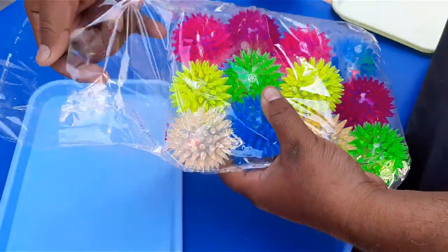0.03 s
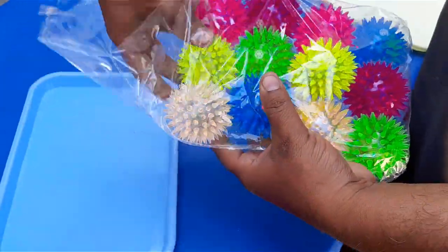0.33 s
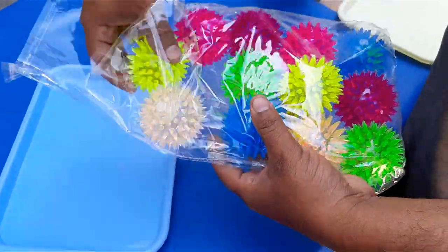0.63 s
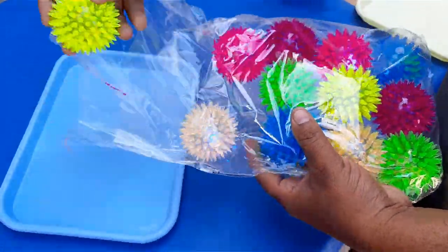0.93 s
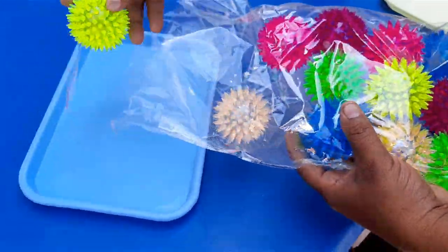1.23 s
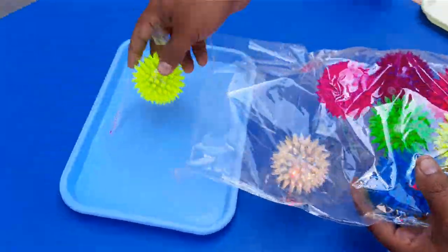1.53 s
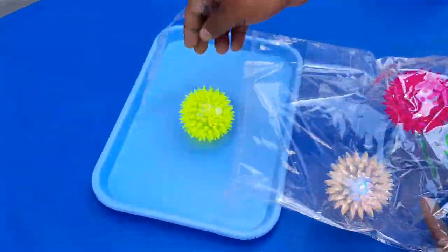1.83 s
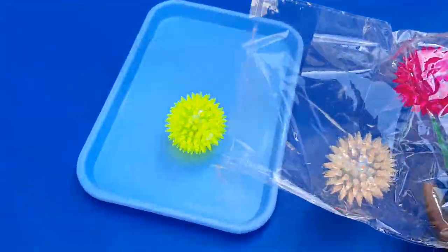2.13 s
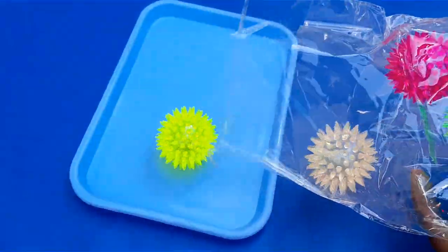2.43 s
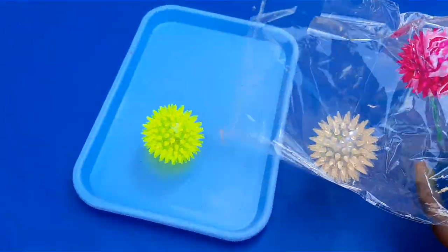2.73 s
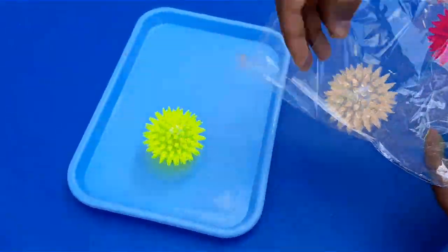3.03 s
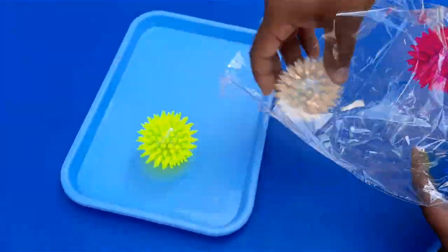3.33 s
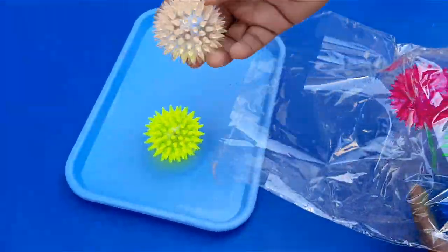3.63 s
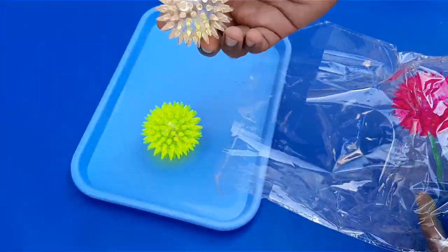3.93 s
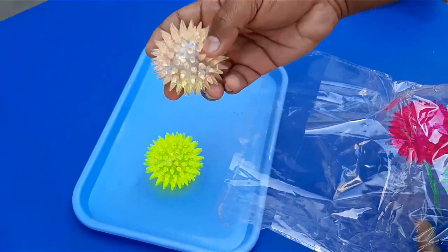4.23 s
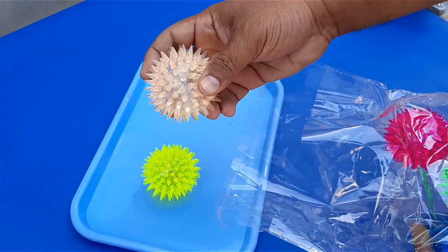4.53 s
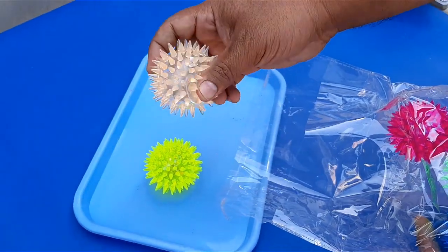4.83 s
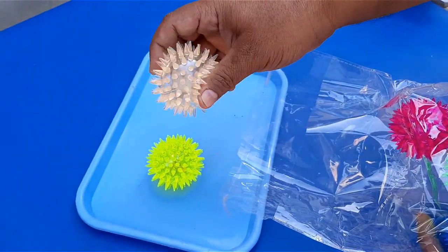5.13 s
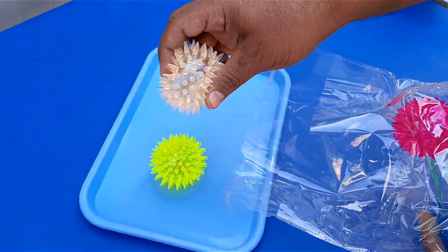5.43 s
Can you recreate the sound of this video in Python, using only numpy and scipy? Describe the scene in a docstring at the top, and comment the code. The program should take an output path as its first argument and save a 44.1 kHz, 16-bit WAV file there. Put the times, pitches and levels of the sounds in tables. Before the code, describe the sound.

Crisp, close rustling of a plastic bag comes in two bursts, followed by short, high squeaks from a squeezed rubber toy ball.

```python
"""A thin, crisp plastic bag crackles close by in a small room as hands pull out two spiky rubber balls.
The film buckles in countless tiny snaps and a few loud ones, over a soft handling rumble.
The second ball is then squeezed four times: its reed squeaks through a short pipe as the air
goes out, and again as the rubber springs back and draws it in."""
import sys
import numpy as np
from scipy import signal
from scipy.fft import rfft, irfft, next_fast_len
from scipy.io import wavfile
from scipy.ndimage import uniform_filter1d, minimum_filter1d, map_coordinates

SR = 44100
rng = np.random.default_rng(int(sys.argv[2]) if len(sys.argv) > 2 else 0)


def bounce(signal):
    """Save signal as a 16-bit WAV file at the path given by the first command-line argument."""
    frames = np.transpose(np.atleast_2d(signal))
    limited = np.clip(frames, -1, 1)
    pcm = np.round(limited * 32767).astype(np.int16)
    wavfile.write(sys.argv[1], SR, pcm)


N = 250488

# loud buckles of the film: t/s, level/dB, sheet body/dB, panel ring/Hz
LOUD_BUCKLES = [(0.0096, -4, -12, 2990), (0.0547, -1, -19, 1460), (0.0814, -6, -9, 2750),
                (0.1145, -6, -10, 1710), (0.2327, -8, -16, 1450), (0.5611, -7, -17, 1520),
                (0.6729, -1, -11, 1830), (0.755, -2, -9, 1590), (0.7775, -6, -8, 1700),
                (0.8424, -13, -6, 1500), (0.8808, -14, 3, 1740), (0.9065, -16, -5, 1790),
                (1.0927, -14, -8, 1770), (1.0985, -14, -11, 1770), (1.1272, -14, -7, 1600),
                (1.1977, -18, -13, 2540), (1.2291, -22, -18, 2960), (1.2728, -17, 3, 1750),
                (1.2894, -17, -3, 1540), (1.3096, -15, -3, 1430), (1.4037, -17, -14, 1290),
                (1.4329, -18, -16, 1500), (1.453, -25, -10, 2900), (1.5719, -20, -14, 2200),
                (1.6942, -36, 12, 1360), (1.7266, -17, -10, 1870), (1.7417, -23, 1, 1440),
                (1.8993, -15, -13, 1830), (1.9223, -19, -13, 2560), (1.9812, -12, -13, 2010),
                (2.0108, -23, -20, 1590), (2.0947, -13, -17, 1580), (2.2716, -10, -9, 1600),
                (2.2808, -17, -10, 1610), (2.3659, -24, 3, 1570), (2.4235, -22, -4, 2600),
                (2.4619, -21, -5, 1730), (2.4806, -16, -3, 1930), (2.5048, -19, -9, 1560),
                (2.5424, -19, -12, 2550), (2.6226, -21, -15, 2900), (2.7268, -20, -3, 2580),
                (2.7763, -21, -10, 1810), (3.0123, -25, -20, 1420), (3.0478, -21, -1, 1990),
                (3.143, -7, -9, 1600), (3.2636, -4, -15, 1730), (3.4276, -13, -7, 1710),
                (3.5584, -25, -19, 1350), (3.6808, -27, -8, 1750)]
# tone colour of the film: f/Hz, level/dB
FILM_SPECTRUM = [(25, -44), (100, -17), (360, -14), (680, -16), (1000, 0), (1600, 1.5), (2600, -0.5),
                 (4200, -6.5), (6500, -2.5), (8500, -1), (10300, -2.5), (12000, -15.5), (15500, -16.5)]
BAG_STILL_S, TOP_HZ = 3.74, 15900  # the crinkling ends; band limit
STALL_HZ, LEAK_S = 1198.3, 0.019  # as the pressure leaks away the pitch sinks to where the reed stalls


def buckles(times, body_db, panel_hz, crack_t60, ring_t60, facet_db, facet_octaves, panel_db, size=1536):
    """One row of peak 1 per buckle: a crack and a short ring, coloured by the facet that flips."""
    # taut film snaps at a higher pitch: t/s, f/Hz
    tautness = [(0, 8000), (.8, 7500), (1.5, 8600), (2.1, 9800), (2.7, 8400), (3.3, 9000), (3.7, 6800)]
    chance = rng.standard_normal((len(times), 2))
    facet_hz = curves(tautness, times)[0][:, None] * np.exp(.18 * chance[:, :1])
    t = np.arange(size) / SR - .0005
    age = np.abs(t) * np.exp(.3 * chance[:, 1:])  # some folds flip at once, others run along the crease
    envelope = (t > 0) * (amp(-60 * age / crack_t60) + amp(-10 - 60 * t / ring_t60))
    hz = np.fft.rfftfreq(size, 1 / SR) + 1
    facet = facet_db * np.exp(-.5 * (np.log2(hz / facet_hz) / facet_octaves) ** 2)
    sheet = body_db[:, None] / (1 + (hz / 3500) ** 4)
    # the flat stretch next to the fold rings, with a half-width of 70 Hz
    panel = 1 + amp(panel_db) / (1 + 1j * (hz - panel_hz[:, None]) / 70)
    bursts = rng.standard_normal(envelope.shape) * envelope
    clicks = irfft(rfft(bursts) * amp(along(FILM_SPECTRUM, hz) + facet + sheet) * panel)
    return clicks / np.abs(clicks).max(axis=1, keepdims=True)


def snaps(events, level_db, body_db):
    """Single sharp clicks; the bigger the fold, the longer its crack."""
    start, db, body, panel_hz = np.transpose(events)
    crack_t60 = .0036 * (1 + 1.5 * amp(db + 7))[:, None]
    clicks = buckles(start, body + body_db, panel_hz, crack_t60,
                     ring_t60=.021, facet_db=7, facet_octaves=.23, panel_db=12)
    out = np.zeros(N)
    add(out, start - .0005, clicks * amp(db + level_db)[:, None])
    return out


def bag_motion():
    """Envelopes of the crackle and of the sheet's body: two digs, short rustles and a faint creep."""
    # a hand digs for a ball, one curve per dig: t/s, crackle/dB, sheet body/dB
    digs = [
        [(0.0, -26, -45), (0.118, -23, -37), (0.128, -29.5, -38.5), (0.202, -23.5, -31), (0.252, -30, -38),
         (0.404, -21, -29.5), (0.55, -33.5, -38.5), (0.566, -25, -30.5), (0.798, -22, -34), (0.87, -41, -39.5)],
        [(2.98, -60, -68.5), (3.052, -38, -43), (3.058, -41.5, -54), (3.156, -24, -30.5), (3.178, -29, -28.5),
         (3.268, -20, -35), (3.296, -32, -39.5), (3.388, -24, -30), (3.534, -52, -53.5), (3.54, -62, -64)],
    ]
    # the bag is let go and sags: t/s, length/s, crackle/dB, sheet body/dB
    rustles = [(.88, .1, -35.5, -38), (1.01, .04, -29, -37.5), (1.11, .04, -33, -42), (1.17, .09, -43, -64),
               (1.285, .035, -41, -44), (1.33, .11, -46.5, -55.5), (1.56, .06, -41.5, -48.5),
               (1.72, .025, -44.5, -39.5), (1.81, .02, -46, -49), (1.96, .04, -45, -45.5),
               (2.03, .08, -57.5, -65), (2.27, .11, -52, -53), (2.395, .03, -43, -51),
               (2.47, .03, -39, -41), (2.53, .08, -56.5, -63.5), (2.76, .03, -48.5, -51.5),
               (2.83, .035, -48.5, -57.5), (3.55, .12, -61, -61)]
    t = np.arange(N) / SR
    # every loud buckle stirs the film around it
    stirred = swells([(s, 0, db - 32) for s, db, *_ in LOUD_BUCKLES], rise_s=.01, fall_s=.022)
    creep = amp(-65)  # held film never quite rests
    envelopes = []
    for layer in range(2):
        gain = swells([(s, length, db[layer]) for s, length, *db in rustles], rise_s=.018, fall_s=.015)
        for dig in digs:
            digging = (t >= dig[0][0]) * (t <= dig[-1][0])
            gain = np.hypot(gain, amp(curves(dig, t)[layer]) * digging)
        envelopes.append(np.sqrt(gain ** 2 + stirred ** 2 + creep ** 2))
    return envelopes


def crinkle(crackle, body, count=1600):
    """Swarms of tiny buckles, denser the harder the bag is worked, over the hiss of film on film."""
    t = np.arange(N) / SR
    stir = crackle * np.clip((BAG_STILL_S - t) / .034, 0, 1)
    rate = stir ** .36
    rate *= count / rate.sum()  # buckles per sample
    slots = np.arange(count) + rng.uniform(-1, 1, count)
    times = np.interp(slots, np.cumsum(rate), t).clip(0, BAG_STILL_S)
    body_spread, level_spread, pitch_spread = rng.standard_normal((count, 3)).T
    body_db = np.interp(times, t, 20 * np.log10(body / crackle)) + 1.5 + 3 * body_spread
    clicks = buckles(times, body_db, panel_hz=1650 * np.exp(.27 * pitch_spread),
                     crack_t60=.007, ring_t60=.03, facet_db=5, facet_octaves=.35, panel_db=5)
    gains = unit(amp(10.8 * np.clip(level_spread, -2, np.sqrt(2)))) / np.linalg.norm(clicks, axis=1)
    swarm = np.zeros(N)
    add(swarm, times, clicks * gains[:, None])
    # balls bump inside the bag: f/Hz, level/dB
    jostle_spectrum = [(25, -27), (350, 1), (520, -3.5), (850, -14.5), (2000, -56.5)]
    lumps = amp(6 * np.tanh(wobble(40, N)))
    jostle = amp(-24.5) * lumps * noise(jostle_spectrum)
    slide = amp(-15.5) * noise(FILM_SPECTRUM)
    return stir * (amp(.5) * swarm / np.sqrt(rate + 1e-4) + slide + jostle)


def reed(hz, db, rough, pipe, jitter, flutter_db, rasp, low_hz):
    """A beating reed: harmonics glide through the pipe's resonances and rattle as roughness rises."""
    t = np.arange(len(hz)) / SR
    hz = hz * (1 + jitter * rough * wobble(700, len(t)))
    phase = 2 * np.pi * np.cumsum(hz) / SR
    orders = np.arange(1, 14)[:, None]
    gains = amp(along(pipe, orders * hz)) * (orders * hz < TOP_HZ)
    # the harmonic nearest the pipe's resonance locks on; the others flutter
    loose = (1 - gains / gains.max(axis=0)) * np.sqrt(np.abs(rough))
    flutter, slip = np.array([[wobble(260, len(t)) for _ in orders] for _ in range(2)])
    gains *= amp(flutter_db * loose * flutter)
    gains /= np.sqrt(np.sum(gains ** 2, axis=0) / 2)
    offsets = 2 * loose ** 2 * slip + rng.uniform(0, 2 * np.pi, orders.shape)
    tone = np.sum(gains * np.sin(orders * phase + offsets), axis=0)
    # turbulence leaves the slit in one puff per cycle
    puffs = rng.standard_normal(len(t)) * (1 + np.cos(phase))
    bins_hz = np.fft.rfftfreq(len(t), 1 / SR)
    low_cut = (bins_hz ** 2 / (bins_hz ** 2 + low_hz ** 2)) ** 2
    jet = unit(irfft(rfft(puffs) * amp(.65 * along(pipe, bins_hz)) * low_cut, len(t)))
    fades = ramp(t, 0, .002) * ramp(t[-1] - t, 0, .002)
    return amp(db) * fades * (tone + rasp * rough * jet)


def squeeze(push_s, length_s, first_hz, pushed_hz, rise_s, db, sag_db, rough, stretch, stall_s=.0098):
    """The outward squeak glides while the fingers push, then sinks as the pressure leaks away."""
    # the pipe's resonances, blowing out: f/Hz, level/dB
    pipe_out = [(250, -26), (700, -31), (1200, -16), (1700, -11), (2200, -18), (2800, -11), (3700, -18.5),
                (4500, -14), (5400, -3.5), (6200, 4), (7100, 4.5), (8200, -5.5), (10000, -9), (11000, -15),
                (12800, -29), (15500, -33)]
    t = np.arange(int(length_s * SR)) / SR
    pressure = np.exp(-np.maximum(t - push_s, 0) / LEAK_S)
    glide = np.exp(-np.minimum(t, push_s) / rise_s)
    driven_hz = pushed_hz + (first_hz - pushed_hz) * glide
    hz = STALL_HZ + (driven_hz - STALL_HZ) * pressure
    level = db - sag_db * (1 - pressure) - 19.5 * ramp(t, length_s - stall_s, stall_s)
    rattle = rough * (2 - pressure * (1 - glide))  # twice as rough at slack pressure
    pipe = [(f * stretch, gain_db) for f, gain_db in pipe_out]
    return reed(hz, level, rattle, pipe, jitter=.022, flutter_db=7, rasp=.26, low_hz=150)


def release(draw_s, pop_s, first_hz, drawn_hz, pop_hz, db, swell_db, rough, stall_s=.02247):
    """The wall springs back: the pitch creeps up, jumps as the dent pops out and sinks into a rattle."""
    # the pipe's resonances, drawing in: f/Hz, level/dB
    pipe_in = [(700, -38), (1200, -16.5), (1700, -10), (2200, -23), (2800, -12.5), (3700, -24), (4500, -19),
               (5700, -19.5), (7100, 1.5), (8300, 1), (9200, -4), (10000, -13.5), (11500, -20.5),
               (12800, -26.5), (15500, -43)]
    length_s = draw_s + pop_s + .0314  # the reed sounds on after the pop
    t = np.arange(int(length_s * SR)) / SR
    pop = ramp(t, draw_s, .007)
    suction = np.exp(-np.maximum(t - draw_s - pop_s, 0) / LEAK_S)
    driven_hz = first_hz + (drawn_hz - first_hz) * ramp(t, 0, draw_s) + (pop_hz - drawn_hz) * pop
    hz = STALL_HZ + (driven_hz - STALL_HZ) * suction
    level = db - swell_db * np.exp(-t / .01) - 19.5 * ramp(t, length_s - stall_s, stall_s)
    rattle = rough + .1 * pop + .4 * (1 - suction)
    return reed(hz, level, rattle, pipe_in, jitter=.036, flutter_db=7.5, rasp=.39, low_hz=800)


def squeaky_ball():
    """Air squeaks and hisses through the reed on the way out and on the way back."""
    # air out: t/s, push/s, length/s, first/Hz, pushed/Hz, rise/s, level/dB, sag/dB, roughness,
    # stretch of the pipe's resonances
    squeezes = [(4.472, .014, 0.03765, 1351, 1332, .003, -8, 2.5, 0.16, 1.046),
                (4.883, .024, 0.08875, 1376, 1457, .007, -8.5, 13, 0.06, 1.071),
                (5.193, .036, 0.0758, 1442, 2202, .007, -3.5, 8.5, 0.32, 0.973),
                (5.478, .042, 0.0791, 1437, 2198, .024, -5, 8, 0.25, 0.993)]
    # air in: t/s, draw/s, pop/s, first/Hz, drawn/Hz, pop/Hz, level/dB, swell/dB, roughness
    releases = [(4.554, 0.04765, 0.019, 1412, 1430, 1488, -9.5, -7.5, 0.01),
                (5.004, 0.0397, .013, 1372, 1443, 1499, -8.5, 4, 0.01),
                (5.292, 0.05403, .011, 1352, 1531, 1702, -10, 12, 0.2),
                (5.573, 0.0454, 0.015, 1277, 1649, 1803, -9.5, 14, .14)]
    # breath of each squeeze and refill: t/s, length/s, level/dB
    airflow = [(4.377, .28, -43), (4.878, 0.25, -48), (5.2, 0.17, -40), (5.49, 0.12, -44.5)]
    # colour of that breath: f/Hz, level/dB
    hiss_spectrum = [(1000, -38.5), (2000, -26.5), (4200, -42), (5600, -24), (7000, 3), (8300, -3),
                     (10300, -5.5), (12900, -17), (15500, -41.5)]
    out = swells(airflow, rise_s=.008, fall_s=.022) * noise(hiss_spectrum)
    for stroke, events, trim_db in (squeeze, squeezes, 2.5), (release, releases, -.5):
        add(out, [row[0] for row in events], [amp(trim_db) * stroke(*row[1:]) for row in events])
    return out


def spike_flicks():
    """Fingers flick the ball's spikes: two faint clicks."""
    # flicks: t/s, level/dB, body/dB, ring/Hz
    flicks = [(3.892, -40.5, -26, 1367), (4.778, -35.5, -46.5, 1345)]
    return snaps(flicks, level_db=2.5, body_db=1)


def handling_rumble(crackle):
    """Dull rumble of gripping hands, bumps and the dragged bag, which follows the crackle."""
    # hands and balls bump the table: t/s, length/s, level/dB
    bumps = [(1.66, 0.053, -52.5), (2.58, 0.0247, -49.5), (3.88, .07, -51.5)]
    # colour of the rumble: f/Hz, level/dB
    rumble_spectrum = [(20, -30), (45, -10), (75, 1), (140, -4), (260, -3.5), (450, -24), (800, -32),
                       (1500, -54.5)]
    hold, shift_grip = (0, 1.6, -67.5), (1.6, 2.77, -57.5)  # same columns as the bumps
    contact = swells(bumps + [hold, shift_grip], rise_s=.022, fall_s=.07)
    drag = amp(-26) * crackle
    return np.hypot(contact, drag) * amp(.69 * wobble(37, N)) * noise(rumble_spectrum)


def rubber_friction():
    """Skin rubs on rubber; a spike chirps as it slips under a finger."""
    # finger strokes: t/s, length/s, level/dB
    rubs = [(3.62, .05, -53), (4.01, 0.042, -63.5), (4.12, 0.031, -61), (4.425, 0.03, -56.5)]
    # colour of rubbed rubber: f/Hz, level/dB
    rubber_spectrum = [(400, -17), (900, -10), (1350, 7), (2000, -21.5), (3300, -17.5), (5400, -20),
                       (13000, -25)]
    # slipping spikes: t/s, f/Hz, level/dB
    slips = [(3.834, 5780, -58), (4.038, 5403, -53)]
    t = np.arange(N) / SR
    out = swells(rubs, rise_s=.02, fall_s=.025) * amp(3.7 * wobble(73, N)) * noise(rubber_spectrum)
    for s, hz, db in slips:
        out += swells([(s, .00412, db)], rise_s=.00092, fall_s=.00403) * np.sin(2 * np.pi * hz * t)
    return out


def landing():
    """The first soft ball meets a tray with one low thud."""
    # the thud: t/s, f/Hz, level/dB, t60/s
    thud = (2.03, 107, -39, 0.01)
    start, hz, db, t60 = thud
    t = np.maximum(np.arange(N) / SR - start, 0)
    return amp(db - 60 * t / t60) * np.sin(2 * np.pi * hz * t)


def room(x, early_db, early_t60, tail_db):
    """Quick echoes from the table and tray, then a faint tail from the walls."""
    # decay of the walls' tail: f/Hz, t60/s
    decay_times = [(1500, 0.23), (4000, 0.37), (7000, 0.083), (8400, 0.26), (10000, 0.14), (13000, 0.04)]
    hz, t, bands = signal.stft(rng.standard_normal(SR // 2), SR, nperseg=256)
    tail = signal.istft(bands * amp(-60 * t / along(decay_times, hz)[:, None]), SR, nperseg=256)[1]
    t = np.arange(len(tail)) / SR
    tail *= ramp(t, 0, .015)
    early = rng.standard_normal(len(t)) * (t > .001) * amp(-60 * t / early_t60)
    echoes = amp(early_db) * early / np.linalg.norm(early) + amp(tail_db) * tail / np.linalg.norm(tail)
    return x + signal.fftconvolve(x, echoes)[:N]


def room_tone():
    """A very faint, dark bed of steady noise."""
    # the still room: f/Hz, level/dB
    still_spectrum = [(30, 3.5), (100, 3), (400, -13), (1400, -8), (3000, -16), (8000, -21), (15000, -35)]
    return amp(-71.5) * noise(still_spectrum)


def amp(db):
    """Decibels to gain."""
    return 10 ** (np.asarray(db) / 20)


def unit(x):
    """Scale to rms 1."""
    return x / np.sqrt(np.mean(x ** 2) + 1e-20)


def ramp(t, start, length):
    """From 0 to 1 over length seconds."""
    return np.clip((t - start) / length, 0, 1)


def along(points, hz):
    """Read (f/Hz, value) points on a log axis."""
    f, values = np.transpose(points)
    return np.interp(np.log(hz + 1), np.log(f + 1), values)


def curves(rows, t):
    """Each column after the time, read at the times t."""
    times, *columns = np.transpose(rows)
    return [np.interp(t, times, column) for column in columns]


def swells(rows, rise_s, fall_s):
    """Envelope of events (t/s, length/s, level/dB) that rise, hold and die away."""
    t, power = np.arange(0, N, 32) / SR, 1e-14
    for s, length, db in rows:
        outside = np.maximum(s - t, 0) / rise_s + np.maximum(t - s - length, 0) / fall_s
        power = power + (amp(db) * np.exp(-outside)) ** 2
    return np.interp(np.arange(N) / SR, t, np.sqrt(power))


def wobble(rate, size):
    """A smooth random curve, rate knots a second."""
    knots = rng.standard_normal(int(size * rate / SR) + 4)
    return map_coordinates(knots, [np.arange(size) * rate / SR])


def filtered(x, response):
    """Equalise x with a gain that depends on frequency."""
    size = next_fast_len(N + SR // 2)
    return irfft(rfft(x, size) * response(np.fft.rfftfreq(size, 1 / SR)), size)[..., :N]


def noise(spectrum):
    """Coloured noise of rms 1."""
    return unit(filtered(rng.standard_normal(N), lambda hz: amp(along(spectrum, hz))))


def add(track, times, sounds):
    """Lay each sound into the track at its time."""
    for s, sound in zip(times, sounds):
        part = track[max(round(s * SR), 0):][:len(sound)]
        part += sound[:len(part)]


def scene():
    """Bag and ball lie almost straight ahead, a little to the right."""
    crackle, body = bag_motion()
    bag = snaps(LOUD_BUCKLES, level_db=-.5, body_db=-1) + crinkle(crackle, body)
    crisp = room(bag + spike_flicks(), early_db=-12, early_t60=.055, tail_db=-18.5)
    squeaks = room(squeaky_ball(), early_db=-9.5, early_t60=.028, tail_db=-28.5)
    bed = handling_rumble(crackle) + rubber_friction() + landing() + room_tone()
    return crisp * amp([[-.08], [.08]]) + (squeaks + bed) * amp([[-.38], [.38]])


def record(dry):
    """A fast limiter holds down the peaks; everything above the band limit is cut."""
    needed = np.minimum(1, .93 / (np.abs(dry).max(axis=0) + 1e-9))
    gain = uniform_filter1d(minimum_filter1d(needed, size=161), size=121)
    return filtered(dry * gain, lambda hz: hz < TOP_HZ)


dry = scene()
out = record(dry)
bounce(out)
```